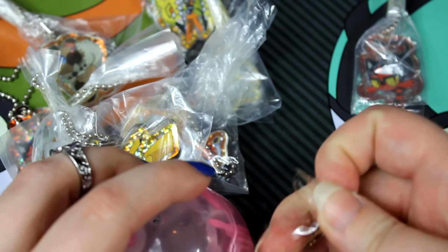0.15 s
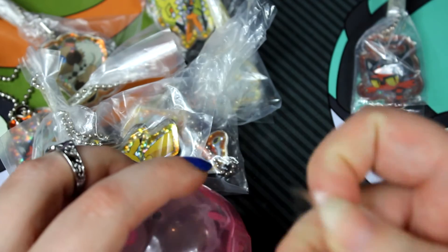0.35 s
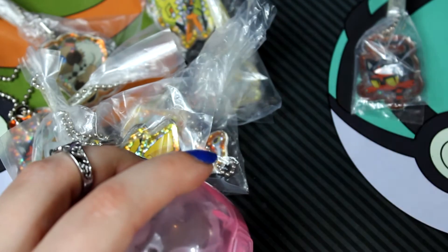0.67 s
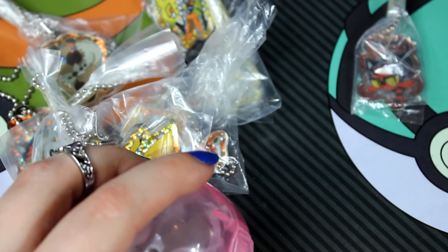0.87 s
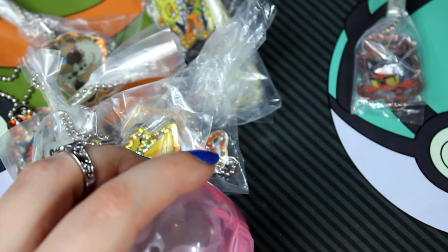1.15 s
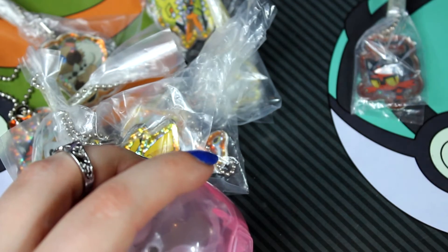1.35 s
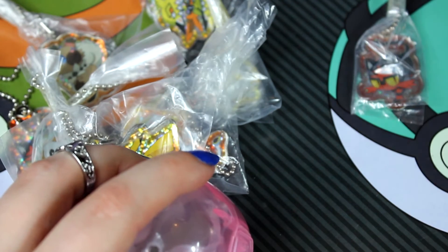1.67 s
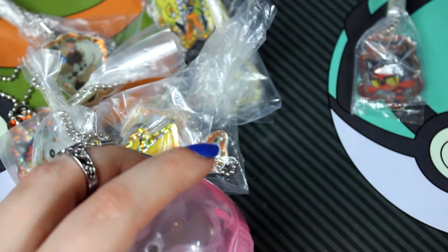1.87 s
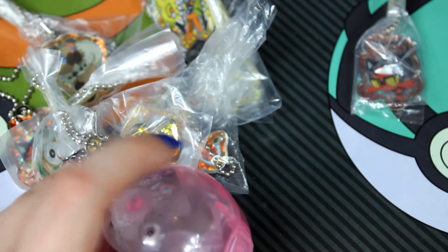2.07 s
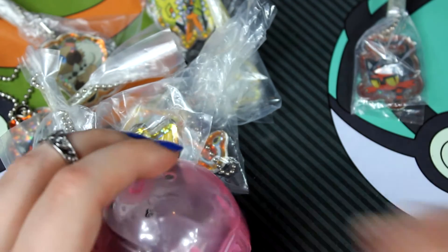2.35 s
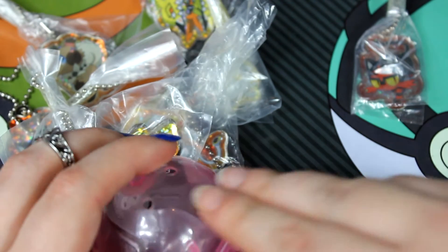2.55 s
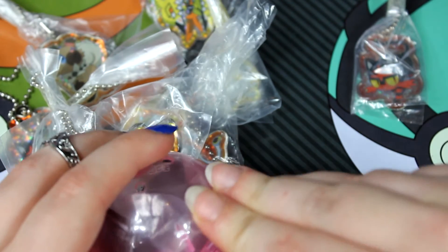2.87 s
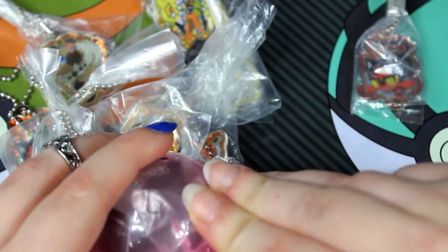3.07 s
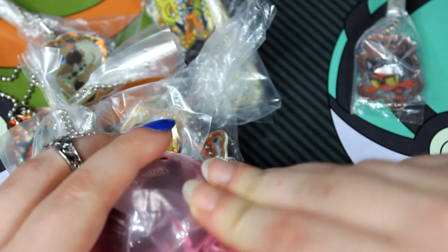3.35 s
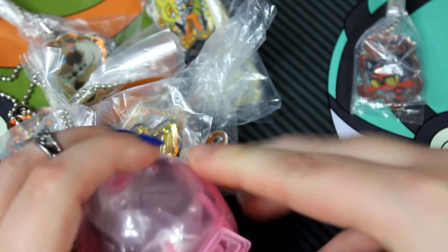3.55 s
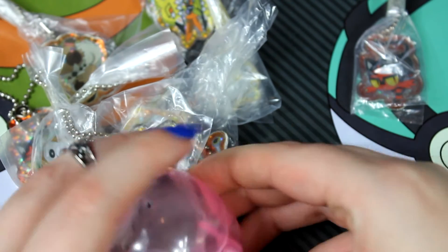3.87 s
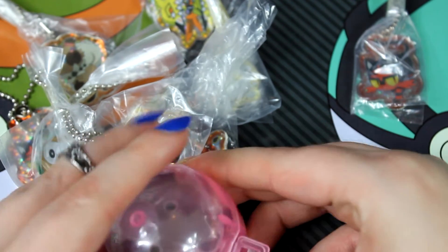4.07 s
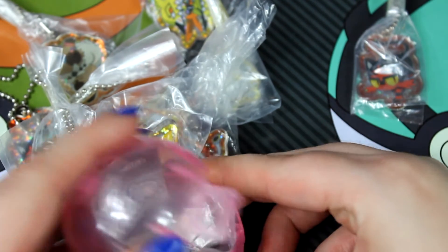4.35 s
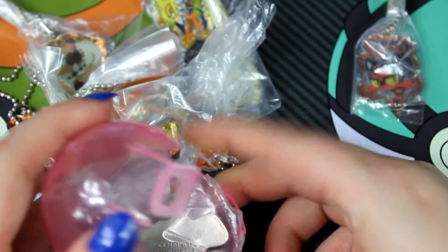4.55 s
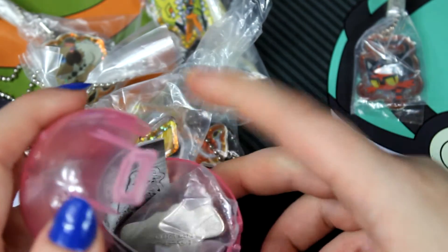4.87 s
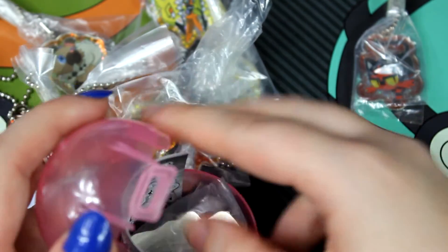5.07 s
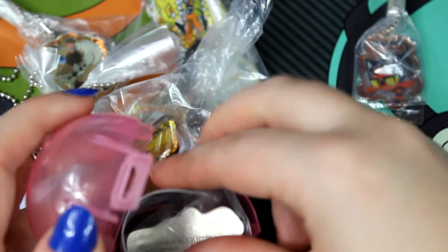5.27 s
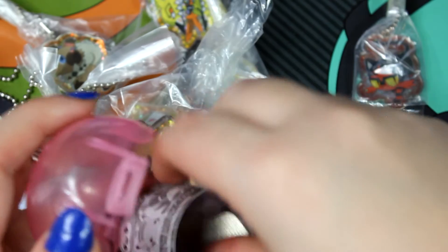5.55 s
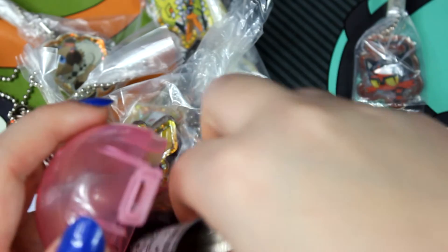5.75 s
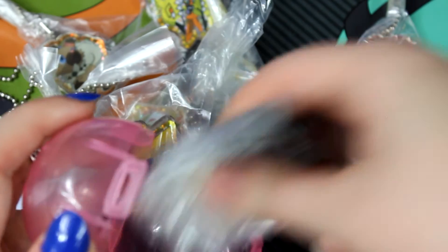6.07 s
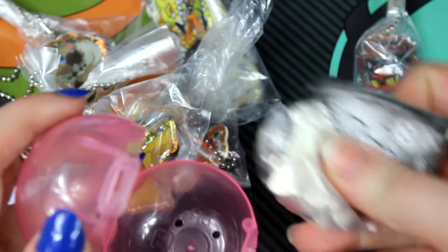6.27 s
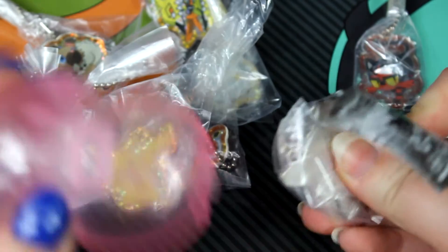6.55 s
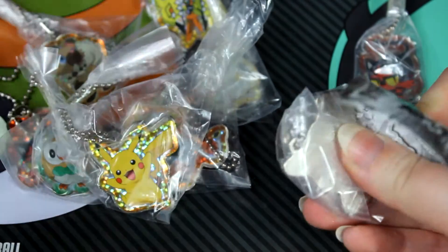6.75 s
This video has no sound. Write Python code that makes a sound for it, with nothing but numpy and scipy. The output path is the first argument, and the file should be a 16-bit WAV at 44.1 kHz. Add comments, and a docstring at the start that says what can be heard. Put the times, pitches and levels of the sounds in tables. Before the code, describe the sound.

Close handling of crinkly film, a short pause, then hollow shell clicks, a sharp pop, rattling plastic and one bright packet crackle.

```python
"""Crinkly bag and hollow capsule

Hands close to a microphone put a crinkly plastic bag aside, then squeeze, snap open and empty a hollow plastic
capsule on a padded mat. Each crackle is a short flurry of slips that rings the film or the shell;
fingers rustle, a small room answers, and hiss and a faint hum lie beneath.
"""
import sys
import numpy as np
from scipy import signal
from scipy.fft import rfft, irfft
from scipy.io import wavfile
from scipy.ndimage import uniform_filter1d

SR = 44100
rng = np.random.default_rng(int(sys.argv[2]) if len(sys.argv) > 2 else 0)


def put_to_file(sound):
    """Save the sound as 16-bit audio at rate SR, in the file named by the first command-line argument."""
    columns = np.atleast_2d(sound).T  # one column per channel
    safe = np.clip(columns, -1, 1)
    whole_steps = np.round(safe * 32767)
    wavfile.write(sys.argv[1], SR, whole_steps.astype(np.int16))


def decibels_to_gain(level_db):
    """Convert a level in decibels to a linear amplitude gain (20 dB per decade)."""
    exponent = np.asarray(level_db, float) / 20
    return 10 ** exponent


N = 304466

# microphone hiss and room tone: hz, relative_db
HISS_SHAPE = [(15, -45), (25, -5.5), (108, -1), (560, 0.5), (2000, -4), (4030, -5.5), (16000, -15)]
HISS_RMS_DB = -55.5
# distant appliance: hz, rms_db
HUM_TONES = [(129.2, -75), (247.6, -74)]
ROOM_T60_S, ROOM_TREBLE_T60_S, ROOM_DB = 0.23, 0.16, -12
# hands and objects landing on the mat: start_s, peak_db, pitch_hz, length_s
CONTACT_THUMPS = [(0.614, -30, 290, 0.068), (1.545, -37.5, 291.6, 0.064), (2.608, -40.5, 151.2, 0.036),
                  (4.03, -42, 268.5, 0.057), (3.107, -39.5, 111.1, 0.037), (6.295, -34.5, 340, 0.058),
                  (6.31, -41, 90, 0.077), (6.769, -37.5, 1404, 0.0082), (6.804, -35, 1544, 0.0088)]
# fingers moving over plastic, one list per spell (bag, shut capsule, open capsule): time_s, rms_db
RUSTLE_SPELLS = [
    [(.3, -48), (.45, -65.5), (.62, -48), (.75, -64), (.95, -56), (1.38, -53), (1.48, -64), (1.8, -62.5)],
    [(3.15, -56), (3.75, -56.5), (4.05, -60), (4.2, -50.5), (4.27, -59), (4.38, -62)],
    [(4.94, -67), (5.02, -46.5), (5.2, -49.5), (5.4, -60.5), (5.6, -48.5), (5.85, -44.5), (6.05, -48)],
]
# loose bag, shut capsule, open capsule: ring_hz, ring_db, treble_db
RUSTLE_COLOURS = [(2720, -2, 4), (1036, -12, -10), (2313, 5.5, -4)]
# freed packet sliding over the hollow halves: time_s, level_db
RUB_LEVELS = [(6.04, -56.5), (6.3, -47), (6.47, -52), (6.6, -64)]
# hollows the slide sounds: ring_hz, relative_db
RUB_HOLLOWS = [(530, 0), (1940, -1.3), (2360, -3.1)]
# film of the bag, later of the packet, buckling: start_s, ring_peak_db, ring_hz, treble_re_ring_db, flurry_ms
FILM_CRINKLES = [(0.019, -26, 4430, -9, 2.5), (0.165, -24.5, 3160, 4, 3.9), (0.237, -17, 1760, -3.5, 4.9),
                 (0.328, -20.5, 4150, -12, 6.1), (0.561, -23, 4350, -1.5, 14),
                 (0.795, -31.5, 2490, -5.5, 12.5), (0.832, -33, 2900, 10.5, 12.5),
                 (0.914, -33.5, 2460, 2.5, 14), (0.943, -30.5, 2480, 5, 8.3), (1.062, -35.5, 2520, -7, 16),
                 (1.242, -35, 3320, -6, 17), (1.319, -33.5, 6200, 4, 10), (1.355, -30, 1480, 0, 16.3),
                 (1.375, -29.5, 2720, 3, 16), (1.554, -33, 2430, 2, 19), (1.643, -15, 2895, -2.5, 4.9),
                 (2.548, -28.5, 1820, -1.5, 3.1), (2.947, -32.5, 3300, -26, 4.6),
                 (3.574, -28, 2470, -13.5, 3.6), (3.619, -21, 2900, -8, 7.9), (4.614, -35, 3240, -10, 6.7),
                 (5.696, -24.5, 3850, -1.5, 5.2), (5.908, -17, 3950, -12, 0.87),
                 (5.913, -16, 5460, -12, 1.5), (5.998, -30.5, 5500, 10, 15), (6.037, -3.5, 5040, -11, 0.83),
                 (6.209, -45, 7000, 19, 2), (6.233, -23, 5700, -26, 2.3), (6.243, -25.5, 5170, 3, 3.1),
                 (6.266, -31, 3460, -12, 1.4)]
BAG_GONE_S = 2.0  # later crinkles are the packet's
# each slip of the peeling seam rings the film and, higher, the seam: mean_peak_db, ring_hz (before band limits)
SEAM_RINGS = [(-12.5, 1790), (-8.5, 18700)]
PEEL_START_S, PEEL_SLIPS_PER_S = 0.2478, 199.0
# small stray ticks; level and spread are over the rustle
TICKS_PER_S, TICK_DB, TICK_SPREAD_DB = 70, 5.5, 2.5
# shell clicking and grinding: start_s, ring_peak_db, treble_re_ring_db, flurry_ms
SHELL_CLICKS = [(2.722, -34.5, -1, 2.4), (2.813, -35.5, -6.5, 9.4), (3.241, -29.5, -50, 6.1),
                (3.357, -36.5, -8.5, 3.4), (3.415, -27.5, -22, 2.2), (3.459, -31.5, -45, 9.9),
                (3.47, -20.5, -9, 12.4), (3.525, -32, -5.5, 3.6), (3.64, -31, -31, 5.7),
                (3.709, -21.5, -19, 0.33), (3.785, -38.5, -18, 16), (3.88, -35, -35, 2.1),
                (4.074, -19, -56, 3.7), (4.115, -25, -17, 3.7), (4.171, -33.5, -31, 14),
                (4.211, -18.5, -12.5, 24), (4.231, -28, -9.5, 12), (4.736, -36, -22, 5.7),
                (5.061, -26.5, -14, 2.5), (5.099, -30.5, -4.5, 2), (5.124, -30, -20, 2),
                (5.157, -27.5, -10, 1.8), (5.248, -20.5, -9, 4.7), (5.329, -41.5, -4, 1),
                (5.359, -32.5, -9.5, 8.6), (5.489, -21, -13.5, 6.1), (5.626, -20.5, -9, 3.2),
                (5.781, -30, -1.5, 4), (5.829, -29.5, -5, 9), (5.858, -16.5, -12.5, 2.5),
                (5.899, -29.5, 1, 18), (5.917, -12, -26, 3.2), (5.959, -24, -8, 8.5), (5.981, -25, -12, 21),
                (6.172, -34, -5, 1.2), (6.487, -40.5, 0.5, 2.1)]
# from GAPE_S the seam gapes and the shut ring climbs ever faster
GAPE_S, GAPE_HZ_PER_S2, OPENS_S = 3.96, 3600, 4.5
# the shut shell also rings above its air space
OVERTONE_RATIO, OVERTONE_DB = 1.62, -8.5
# hard snaps of the rim: start_s, body_peak_db, tilt_db_per_octave (away from 800 Hz), treble_re_body_db, flurry_ms
RIM_SNAPS = [(3.101, -10, 2, -35, 11.4), (5.032, -14.5, -8, -18, 2.1)]
# modes of the whole shell: hz, relative_db, t60_s
SHELL_MODES = [(248, -19, 0.15), (500, -5, 0.02), (624, -4.5, 0.03), (785, -2.5, 0.027), (875, -1.5, 0.045),
               (1210, 0.5, 0.02), (1760, 4.5, 0.019), (2190, 6, 0.017), (2665, 2, 0.027),
               (3250, 0.5, 0.045), (3800, 1.5, 0.019)]
CONVERTER_OFFSET, TOP_HZ = 0.0011, 15900


def band(x, lo_hz, hi_hz, order=2):
    """Band-pass, gentle unless asked to be steep."""
    return signal.sosfilt(signal.butter(order, [lo_hz, min(hi_hz, 0.45 * SR)], "band", fs=SR, output="sos"), x)


def peak(x, db):
    """Scale to a peak level."""
    return x * decibels_to_gain(db) / np.abs(x).max()


def fade(t60_s, size):
    """Exponential decay."""
    return np.exp(-np.log(1000) * np.arange(size) / SR / t60_s)


def add(out, start_s, x):
    """Mix a sound in at its start time."""
    i = int(start_s * SR)
    out[i:i + len(x)] += x[:N - i]


def level_curve(time_s, db):
    """Gain through the given points, -120 dB outside them."""
    return decibels_to_gain(np.interp(np.arange(N) / SR, time_s, db, -120, -120))


def hiss():
    """Steady room tone and microphone noise: white noise shaped over frequency."""
    hz, db = np.transpose(HISS_SHAPE)
    f = np.fft.rfftfreq(N, 1 / SR)
    shape = decibels_to_gain(np.interp(np.log(f + 1), np.log(hz), db))
    x = irfft(rfft(rng.standard_normal(N)) * shape, N)
    return decibels_to_gain(HISS_RMS_DB) * x / x.std()


def hum():
    """Two wavering low tones, each a narrow band of noise."""
    out = np.zeros(N)
    for hz, db in HUM_TONES:
        tone = band(rng.standard_normal(N), hz / 1.04, hz * 1.04)
        out += decibels_to_gain(db) * tone / tone.std()
    return out


def room(x):
    """Diffuse echoes of a small furnished room, the treble dying first."""
    size = SR // 2
    low, high = rng.standard_normal((2, size))
    tail = band(low, 76, 2930) * fade(ROOM_T60_S, size)
    tail += band(high, 2900, 12200) * fade(ROOM_TREBLE_T60_S, size)
    tail[:int(0.004 * SR)] = 0
    return decibels_to_gain(ROOM_DB) * signal.fftconvolve(x, tail / np.sqrt(np.sum(tail ** 2)))[:N]


def thumps(bump_s=0.0082, bumpy_db=3):
    """A swelling, bumpy puff of noise around each contact's own pitch, from dull thud to short knock."""
    out, size = np.zeros(N), 8192
    for start_s, db, hz, length_s in CONTACT_THUMPS:
        t = np.arange(size) / SR / max(length_s, 0.01)
        bumps = decibels_to_gain(bumpy_db * np.repeat(rng.standard_normal(size), int(bump_s * SR))[:size])
        puff = band(bumps * rng.standard_normal(size), 0.35 * hz, 2.6 * hz)
        add(out, start_s, peak(puff * t * np.exp(-3 * t), db))
    return out


def grains(per_s, spread_db, patchy_db, patch_s=0.025):
    """Tiny slips of uneven size that come in ragged patches."""
    k = int(patch_s * SR)
    patches = uniform_filter1d(np.repeat(rng.standard_normal(N // k + 1), k), k)[:N]
    size_db = spread_db * rng.exponential(size=N) + patchy_db * patches
    size = decibels_to_gain(size_db) * rng.standard_normal(N)
    return (rng.random(N) < per_s / SR) * size


def rustle(mid_db=3.0):
    """Scuffs fill the low mids and ring whatever is handled; fine crackle fills mids and treble."""
    scuffs = grains(2200, spread_db=3.0, patchy_db=6.5)
    fine = grains(2000, spread_db=-0.5, patchy_db=-6.5)
    wide = decibels_to_gain(mid_db) * (band(scuffs, 255, 1500) + band(fine, 910, 4670))
    treble = band(fine, 1600, 19845)
    out = np.zeros(N)
    for spell, (hz, ring_db, treble_db) in zip(RUSTLE_SPELLS, RUSTLE_COLOURS):
        time_s, db = np.transpose(spell)
        hollow = band(scuffs + 0.21 * fine, hz / 1.3, hz * 1.05)
        tone = decibels_to_gain(ring_db) * hollow + wide + decibels_to_gain(treble_db) * treble
        # even out the level over 0.2 s so that the curve sets it
        rms = np.sqrt(np.abs(uniform_filter1d(tone ** 2, size=SR // 5)) + 1e-12)
        out += level_curve(time_s, db) * tone / rms
    return out


def rub(width=1.04, wide_db=-9):
    """A smooth, slightly patchy slide that sounds a few narrow hollows."""
    scuffs = grains(6000, spread_db=1.5, patchy_db=2.5)
    x = decibels_to_gain(wide_db) * band(scuffs, 170, 4200)
    for hz, db in RUB_HOLLOWS:
        # the root offsets the wider band of a higher ring
        x += decibels_to_gain(db) * band(scuffs, hz / width, hz * width) / np.sqrt(hz / 1000)
    return level_curve(*np.transpose(RUB_LEVELS)) * x / x.std()


def ring(hz, cycles, size=2048):
    """A hollow resonance with two neighbours of chance pitch; high ones are damped within fewer cycles."""
    t = np.arange(size) / SR
    detune = np.clip(rng.standard_normal(2), -1.5, 1.5)
    near = sum(np.sin(2 * np.pi * hz * (1 + 0.098 * a) * t) for a in detune)
    return (np.sin(2 * np.pi * hz * t) + 1.7 * near) * fade(cycles / hz * (1000 / hz) ** 0.1, size)


def flurry(ms, slips_per_ms, size=4096):
    """Sparse slips: a short flurry opens with its sharpest slip, a long one swells first."""
    ms = max(ms, 0.3)
    t = np.arange(size) / SR * 1000 / ms
    chance, height = rng.random((2, size))
    lead = min(1, 8 / ms) ** 2
    slips = (chance < slips_per_ms * 1000 / SR) * (2 * height - 1)
    slips = 0.8 * slips * np.exp(-t ** 2) * np.minimum(1, lead + 3 * t)
    slips[0] = lead
    return slips


def crackles(table, cycles, slips_per_ms, grit_t60_s, mid_db, knock_db):
    """Each flurry rings a hollow pitch, scatters dry grit over mids and treble, and knocks around that pitch."""
    out = np.zeros(N)
    for start_s, db, hz, treble_db, ms in table:
        slips = flurry(ms, slips_per_ms)
        size = len(slips)
        body = signal.fftconvolve(slips, ring(hz, cycles))[:size]
        spray = signal.fftconvolve(np.abs(slips), fade(grit_t60_s, 1024))[:size]
        grit = 0.31 * slips + spray * rng.standard_normal(size)
        hollow = peak(band(body, 580, 11400, order=4), db)
        # a crisp slip is strong in the mids as well, a dull one is mostly hollow ring
        mids = peak(band(grit, 1630, 6770), db + mid_db + 0.71 * treble_db)
        knock = peak(band(grit, hz / 3.3, hz * 2.8, order=3), db + knock_db)
        treble = peak(band(grit, 4720, 15600), db + treble_db)
        add(out, start_s, hollow + mids + knock + treble)
    return out


def bag():
    """Loose film buckles and rings briefly."""
    rows = [row for row in FILM_CRINKLES if row[0] < BAG_GONE_S]
    return crackles(rows, cycles=6.5, slips_per_ms=1.5, grit_t60_s=0.0095, mid_db=1.0, knock_db=-30)


def packet():
    """Stiffer film buckles and rings longer than the bag."""
    rows = [row for row in FILM_CRINKLES if row[0] > BAG_GONE_S]
    return crackles(rows, cycles=16.6, slips_per_ms=1.9, grit_t60_s=0.0082, mid_db=1.0, knock_db=-15.5)


def seam(count=8):
    """A sealed seam peels by stick-slip at a nearly steady rate."""
    rows = []
    for k, (jitter, *luck) in enumerate(rng.standard_normal((count, 3))):
        start_s = PEEL_START_S + (k + 0.03 * jitter) / PEEL_SLIPS_PER_S
        for j, (db, hz) in enumerate(SEAM_RINGS):
            rows.append((start_s, db + (1 + 2 * j) * luck[j], hz, -6.0, 1.2))
    return crackles(rows, cycles=24.0, slips_per_ms=1, grit_t60_s=0.013, mid_db=0.5, knock_db=-22)


def ticks(count=120):
    """Rows of chance ticks in each spell of handling, their level following the rustle."""
    rows = []
    for spell, (ring_hz, _, treble_db) in zip(RUSTLE_SPELLS, RUSTLE_COLOURS):
        time_s, db = np.transpose(spell)
        gap, size, pitch, dull = rng.random((count, 4)).T
        start_s = time_s[0] - np.cumsum(np.log(1 - gap)) / TICKS_PER_S
        level_db = np.interp(start_s, time_s, db) + TICK_DB - TICK_SPREAD_DB * np.log(1 - size)
        hz = ring_hz * (0.85 + 0.4 * pitch)
        spell_rows = zip(start_s, level_db, hz, treble_db - 24 * dull, 2 + 6 * gap)
        rows += [row for row in spell_rows if row[0] < time_s[-1]]
    return rows


def air_space_hz(s):
    """The enclosed air rings low while shut, climbs as the seam gapes, and is high once open."""
    shut_hz, open_hz = RUSTLE_COLOURS[1][0], RUSTLE_COLOURS[2][0]
    if s < OPENS_S:
        return shut_hz + GAPE_HZ_PER_S2 * max(s - GAPE_S, 0) ** 2
    return open_hz


def clicks():
    """Rows of clicks at the air space's pitch, with an overtone until the seam gapes."""
    rows = [(s, db, air_space_hz(s), treble_db, ms) for s, db, treble_db, ms in SHELL_CLICKS]
    overtones = [(s, db + OVERTONE_DB, hz * OVERTONE_RATIO, treble_db, ms)
                 for s, db, hz, treble_db, ms in rows if s < GAPE_S]
    return rows + overtones


def capsule():
    """Clicks, grinding and stray ticks ring for many cycles."""
    return crackles(clicks() + ticks(), cycles=24.3, slips_per_ms=2.2, grit_t60_s=0.0081,
                    mid_db=5.5, knock_db=-20.0)


def snaps(slips_per_ms=3.0, crack_db=-1, crack_t60_s=0.016):
    """A sharp break and its rattle ring every mode of the shell, under a dry crack and a spit of treble."""
    out, size = np.zeros(N), 4096
    t = np.arange(size) / SR
    for start_s, db, tilt_db, treble_db, ms in RIM_SNAPS:
        slips = flurry(ms, slips_per_ms)
        modes = np.zeros(size)
        for k, (hz, mode_db, t60_s) in enumerate(SHELL_MODES):
            gain = (-1) ** k * decibels_to_gain(mode_db + tilt_db * abs(np.log2(hz / 800)))
            modes += gain * np.sin(2 * np.pi * hz * t) * fade(t60_s, size)
        body = band(signal.fftconvolve(slips, modes)[:size], 82, 12000)
        spray = signal.fftconvolve(np.abs(slips), fade(crack_t60_s, 1024))[:size]
        grit = spray * rng.standard_normal(size)
        crack_top_hz = max(3000 * decibels_to_gain(2.0 * tilt_db), 1200)
        crack = peak(band(grit, 376, crack_top_hz), db + crack_db)
        treble = peak(band(grit, 3300, 14000), db + treble_db)
        add(out, start_s, peak(body, db) + crack + treble)
    return out


def scene():
    """Bag, packet, capsule, mat and fingers in the room, over hiss and hum."""
    near = thumps() + rustle() + rub() + bag() + seam() + packet() + capsule() + snaps()
    return (near + room(near) + hiss() + hum())[None]


def top_cut(x):
    """Nothing passes above the cut-off."""
    return signal.sosfilt(signal.butter(12, 16980, fs=SR, output="sos"), x)


def record(dry):
    """The recorder cuts the top steeply and its converter adds a slight steady bias."""
    low_pass = signal.ellip(8, 0.2, 60, TOP_HZ, fs=SR, output="sos")
    mix = signal.sosfilt(low_pass, dry) + CONVERTER_OFFSET
    return top_cut(mix)


dry = scene()
out = record(dry)
put_to_file(out)
```